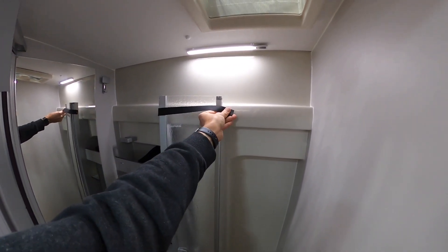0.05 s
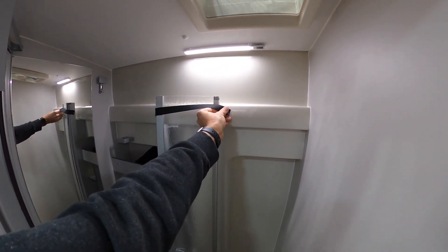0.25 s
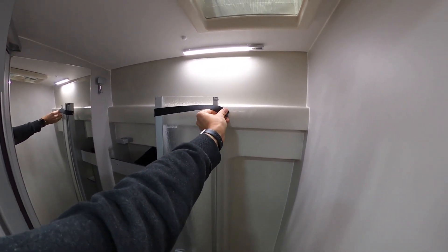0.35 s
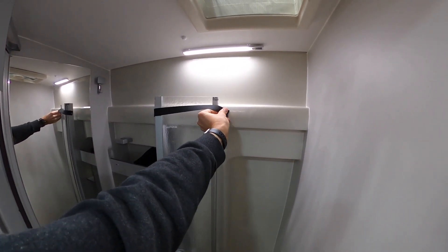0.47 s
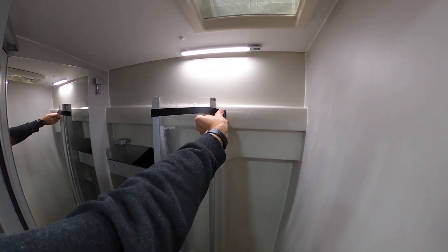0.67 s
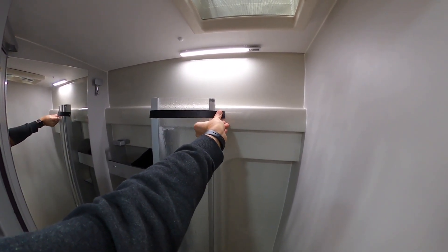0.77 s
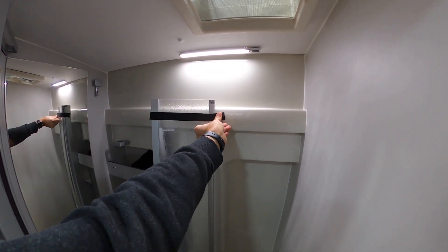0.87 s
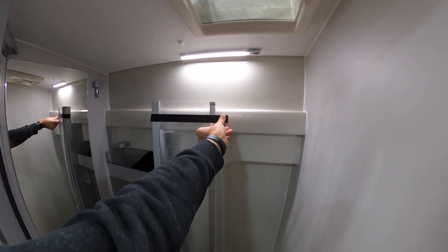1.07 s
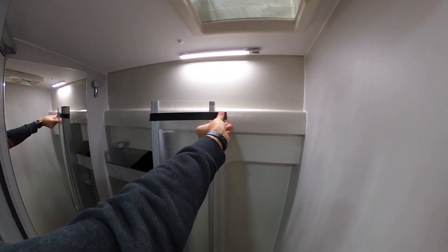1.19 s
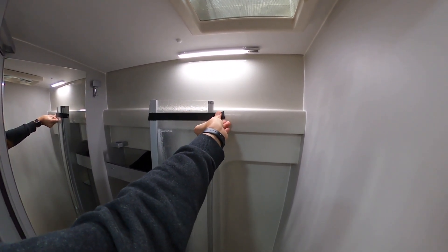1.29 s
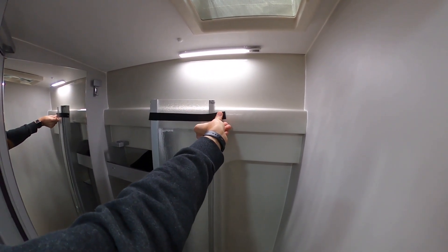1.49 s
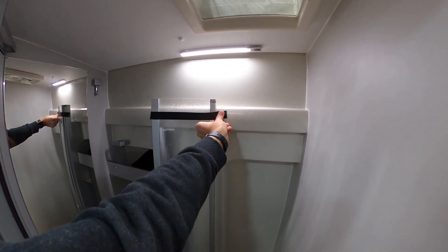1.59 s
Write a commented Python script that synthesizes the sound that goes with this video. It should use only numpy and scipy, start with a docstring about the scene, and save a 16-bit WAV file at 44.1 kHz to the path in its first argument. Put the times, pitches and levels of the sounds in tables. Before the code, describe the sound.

Hollow plastic panel knocks and short rattles as a folding shower door is pushed along.

```python
"""Knocks, hollow booms and short rattles: a folding plastic shower door is pushed along its rail.
The place is a very small washroom, its close walls smearing every contact over a low background rumble.
Shaped noise makes the background, the swaying panels, the rattles, the rubbing gliders
and the short noisy swells that lead into the knocks.
Decaying sines make the flexing panels, their boom and the brief ring of the rail."""
import sys
import numpy as np
from scipy import signal
from scipy.fft import irfft
from scipy.io import wavfile
from scipy.ndimage import uniform_filter1d

SR = 44100
rng = np.random.default_rng(int(sys.argv[2]) if len(sys.argv) > 2 else 0)


def master(y):
    """Save y as 16-bit WAV."""
    cut = np.clip(np.atleast_2d(y).T, -1, 1)
    pcm = np.round(cut * 32767)  # scale
    wavfile.write(sys.argv[1], SR, pcm.astype(np.int16))


N = 72765
TIME = np.arange(N) / SR
STRIKE_TIME = TIME[:SR // 2]  # half a second for each knock
CUTOFF_HZ = 15600


def from_db(db):
    """Decibels to gain."""
    return 10 ** (np.asarray(db) / 20)


def fade(t, t60):
    """Exponential decay that loses 60 dB in t60 seconds."""
    return np.exp(-np.log(1000) * t / t60)


def noise(spectrum, low_hz, high_hz, size):
    """Noise of rms 1, coloured by (hz, db) points between two soft edges, with random phases."""
    hz = np.maximum(np.fft.rfftfreq(size, 1 / SR), 1)
    point_hz, point_db = np.transpose(spectrum)
    edges = 1 / np.sqrt((1 + (low_hz / hz) ** 12) * (1 + (hz / high_hz) ** 12))
    gain = from_db(np.interp(np.log(hz), np.log(point_hz), point_db)) * edges
    x = irfft(gain * np.exp(2j * np.pi * rng.random(len(hz))), size)
    return x / x.std()


def evened(x, size):
    """Takes the slow swell out of a sound by dividing by its running rms."""
    return x / np.sqrt(uniform_filter1d(x * x, size, mode="wrap") + 1e-9)


def wander(length, size):
    """Smooth chance that changes about every `size` samples, spread 1."""
    x = rng.standard_normal(length)
    for _ in range(3):
        x = uniform_filter1d(x, size, mode="wrap")
    return x / x.std()


def follow(points):
    """Gain over time from (start_s, level_db) points, straight in dB between them."""
    start_s, level_db = np.transpose(points)
    return from_db(np.interp(TIME, start_s, level_db))


def add(out, start_s, sound):
    """Mixes a sound in at its start time."""
    i = max(int(start_s * SR), 0)
    out[i:i + len(sound)] += sound[:len(out) - i]


# edges of the registers thud, body, clack, click, tick, snap: edge_hz
REGISTER_EDGES = [30, 130, 550, 2000, 6000, 11500, 16000]


def register_of(hz):
    """Index of the register that holds a frequency."""
    return np.searchsorted(REGISTER_EDGES, hz) - 1


# colour of the room's background: pitch_hz, relative level_db (per Hz)
BACKGROUND_COLOUR = [(15, -8), (26, 6.5), (60, -18), (115, -17.5), (243, -32.5), (400, -33), (558, -34),
                     (811, -39), (1150, -33), (1600, -40.5), (3000, -65.5), (8000, -65), (15000, -83.5)]
# faint steady whine: pitch_hz, level_db
WHINE_TONES = [(9000, -93.5), (13500, -99)]
BACKGROUND_DB = -52.5


def background():
    """The room at rest: steady noise, a low rumble with some hiss, plus faint high sine tones."""
    whine = sum(from_db(db) * np.sin(2 * np.pi * hz * TIME) for hz, db in WHINE_TONES)
    return from_db(BACKGROUND_DB) * noise(BACKGROUND_COLOUR, 30, CUTOFF_HZ, N) + whine


# colour of the panels in the room: pitch_hz, relative level_db
PANEL_COLOUR = [(30, -5), (55, -5.5), (72, -2.5), (100, 2.5), (135, -8), (190, 0), (260, -6), (380, -6.5),
                (450, -17.5), (650, -19.5), (790, -14), (900, -16.5), (1130, -18), (1260, -4.5),
                (1480, -20.5), (1800, -16.5), (2150, -19.5), (2550, -18), (3300, -19.5), (4200, -23.5),
                (5400, -24.5), (6800, -31), (8400, -30), (10500, -38.5), (13200, -43.5), (15500, -49)]
# swaying of the panels under the hand: start_s, level_db
SWAY_LEVELS = [(0, -41.5), (.18, -56), (.5, -61.5), (.7, -55.5), (.85, -52), (1.05, -50.5), (1.3, -46.5),
               (1.45, -58.5), (1.65, -66)]
SWAY_TOP_HZ = 262


def swaying():
    """Moving panels rumble: evened low noise whose level follows their sway."""
    rumble = noise(PANEL_COLOUR, REGISTER_EDGES[0], SWAY_TOP_HZ, N)
    return follow(SWAY_LEVELS) * evened(rumble, size=2000)


# noise levels over time, before grain: rubbing gliders, and short noisy swells leading into the knocks:
# start_s, middle-band level_db, hiss level_db
NOISE_LEVELS = [(0, -60, -78), (.07, -58.5, -78.5), (.135, -64.5, -70), (0.198, -67.5, -74),
                (0.216, -49, -55), (.24, -79, -87), (.38, -77, -87), (.45, -72.5, -80), (0.558, -82, -93.5),
                (0.585, -55, -65), (.61, -53, -63), (.72, -70, -84.5), (.82, -70.5, -82.5),
                (0.891, -67.5, -85), (1.0, -71.5, -92), (1.04, -63.5, -78), (1.075, -69.5, -86.5),
                (1.119, -43.5, -53.5), (1.21, -57.5, -72), (1.303, -53, -66), (1.342, -65, -70.5),
                (1.36, -44, -57.5), (1.42, -58, -81), (1.52, -74, -89), (1.65, -77.5, -96)]
# colour of the middle band: pitch_hz, relative level_db
MIDDLE_COLOUR = [(620, 1), (800, -4.5), (1050, -2.5), (1260, 3.5), (1480, -3.5), (2100, -7.5), (2650, -5),
                 (2950, -8.5), (3300, -6.5), (4300, -11.5), (5400, -12), (6800, -26)]
# colour of the hiss: pitch_hz, relative level_db
HISS_COLOUR = [(5400, 2), (7000, -4), (8500, -7.5), (10500, -14), (13200, -13.5), (15500, -22)]
MIDDLE_LOW_HZ, MIDDLE_HIGH_HZ, GRAIN_DB = 636, 5340, 1
GROAN_DB, GROAN_HZ = 3.5, (323, 448)  # level above the middle band, band edges


def rubs_and_swells():
    """Grainy noise, hiss and a low groaning band: rubbing gliders and short swells into the knocks."""
    start_s, middle_db, hiss_db = np.transpose(NOISE_LEVELS)
    middle_gain = follow(np.column_stack([start_s, middle_db]))
    hiss_gain = follow(np.column_stack([start_s, hiss_db]))
    middle = middle_gain * noise(MIDDLE_COLOUR, MIDDLE_LOW_HZ, MIDDLE_HIGH_HZ, N)
    hiss = hiss_gain * noise(HISS_COLOUR, MIDDLE_HIGH_HZ, CUTOFF_HZ, N)
    groan = from_db(GROAN_DB) * middle_gain * evened(noise(PANEL_COLOUR, *GROAN_HZ, N), size=800)
    grain = from_db(GRAIN_DB * wander(N, size=70))
    return (middle + hiss) * grain + groan


# knocks of panels and gliders: start_s, flex pitch_hz of the panel, brightest resonance pitch_hz,
# then relative level_db of thud, body, clack, click, tick, snap
KNOCKS_TABLE = [(0.014, 165, 794, -46, -52, -52.5, -57, -69.5, -92),
                (0.032, 175, 760, -44, -38, -46.5, -72, -79, -94.5),
                (0.2167, 346, 5100, -30, -25.5, -40, -41, -54.5, -60),
                (0.222, 180.7, 990, -26.5, -20, -36, -43.5, -59, -76),
                (0.256, 61.5, 1240, -39, -35, -58, -65, -86, -96),
                (0.587, 347, 1230, -47.5, -43.5, -43.5, -45, -57.5, -76),
                (0.621, 75.3, 2850, -40, -52, -58, -65, -80, -90),
                (0.633, 342, 4700, -38.5, -52.5, -52, -45, -58.5, -61),
                (0.651, 85, 4170, -49, -59, -74, -53.5, -78, -78),
                (0.737, 112, 5000, -36.5, -50, -79, -71, -76, -85),
                (0.879, 125, 3570, -35.5, -44.5, -79, -66.5, -77.5, -91),
                (0.950, 199, 1460, -36, -43, -50, -66, -90, -99),
                (0.969, 205, 1050, -49.5, -35, -53.5, -73, -88, -99),
                (1.094, 329, 3300, -58, -42, -53, -54.5, -78, -88),
                (1.123, 350, 2450, -49, -40, -36.5, -37, -46, -58),
                (1.130, 101, 1286, -42.5, -37.5, -33.5, -37, -48, -61),
                (1.165, 398, 5740, -43, -35.5, -41, -49.5, -75, -78),
                (1.176, 203, 1510, -38, -32.5, -51, -67, -77, -84),
                (1.191, 217, 900, -58, -37.5, -60, -73, -87, -90),
                (1.25, 387, 3180, -38, -46.5, -63, -53, -76, -80),
                (1.285, 93, 1260, -35.5, -45, -51.5, -65, -76, -70),
                (1.295, 51, 3270, -40.5, -54, -68, -64, -80, -73),
                (1.361, 401, 1670, -44, -33, -35.5, -40.5, -50.5, -50.5),
                (1.373, 287, 1050, -62, -32.5, -42.5, -65, -73, -71),
                (1.439, 220, 3820, -40, -48, -52.5, -52.5, -75, -83)]
FLEX_DB, FLEX_CYCLES = 6.5, 13.7  # level above the knock's register, cycles to fade 60 dB


def flexing():
    """The struck panel springs back and forth for a few cycles, a quickly fading sine."""
    out, t = np.zeros(N), STRIKE_TIME
    for start_s, flex_hz, _, *levels in KNOCKS_TABLE:
        onset = 1 - np.exp(-(2 * t * flex_hz) ** 2)
        swing = np.sin(2 * np.pi * flex_hz * t) * onset * fade(t, FLEX_CYCLES / flex_hz)
        add(out, start_s, from_db(FLEX_DB + levels[register_of(flex_hz)]) * swing)
    return out


# booming modes of the hollow panels: pitch_hz, relative level_db, t60_s
BOOM_MODES = [(55.3, -7.5, 0.39), (106, -12, .3), (169, -18.5, 0.44), (194.5, -16.5, 0.45),
              (227.7, -18.5, 0.2), (272, -11.5, 0.14), (341.9, -14, 0.24), (385.7, -13.5, 0.16),
              (489, -19.5, 0.16)]
# ringing modes of the rail and frame: pitch_hz, relative level_db, t60_s
FRAME_MODES = [(891.3, -14.5, 0.22), (1260, -10, 0.2), (1280, -29, .16), (1755, -14, .2), (1934, -15, .15),
               (2480, -12.5, 0.19), (2550, -6.5, 0.17), (3310, -13, 0.13), (5420, -15.5, .17),
               (6115, -7.5, .15), (8220, -11, 0.12), (13200, -9, .13)]
PANEL_DB, RAIL_DB = -3.5, -2.5
MODE_SPREAD_DB, FAVOUR_DB = 2.5, 8.5  # chance per strike, lift for modes near the knock's own pitches
BRIGHT_OCTAVES = 0.12  # width of a knock's favoured pitches


def ringing(modes):
    """Knocks strike each mode as hard as its register, favouring modes near their own pitches."""
    out, t = np.zeros(N), STRIKE_TIME
    for hz, db, t60 in modes:
        register = register_of(hz)
        attack_s = REGISTER_DECAY[register][1]
        onset = 1 - np.exp(-(t / attack_s) ** 2)
        tone = np.sin(2 * np.pi * hz * t) * fade(t, t60) * onset
        for start_s, flex_hz, bright_hz, *levels in KNOCKS_TABLE:
            octaves_away = np.log2(hz / np.array([flex_hz, bright_hz]))
            near = np.exp(-(octaves_away / BRIGHT_OCTAVES) ** 2).max()
            chance_db = MODE_SPREAD_DB * rng.standard_normal()
            strike_db = db + levels[register] + FAVOUR_DB * near + chance_db
            add(out, start_s, from_db(strike_db) * tone)
    return out


BRIGHT_DB = 9


def brightened(centre_hz):
    """The panels' colour with the resonance nearest the contact lifted."""
    hz = np.geomspace(REGISTER_EDGES[0], REGISTER_EDGES[-1], 400)
    point_hz, point_db = np.transpose(PANEL_COLOUR)
    lift = BRIGHT_DB * np.exp(-(np.log2(hz / centre_hz) / BRIGHT_OCTAVES) ** 2)
    return np.column_stack([hz, np.interp(np.log(hz), np.log(point_hz), point_db) + lift])


# how each register rattles: relative level_db, attack_s, t60_s, relative level_db of the lingering tail
REGISTER_DECAY = [(-2.5, 0.0027, .15, -14), (-2.5, 0.0017, 0.19, -15.5), (0.5, 0.0005, 0.15, -18),
                  (0, 0.0017, 0.14, -20.5), (0.5, 0.0018, 0.14, -26), (-1, .0008, 0.12, -30)]
TAIL_T60_S = 0.35
REFLECTION_SPREAD_DB, REFLECTION_FADE_S = 2, 0.053  # starting spread, time for it to fall to 1/e


def rattle():
    """Close walls smear each knock: bunched early reflections merge into a tail in every register."""
    out, t = np.zeros(N), STRIKE_TIME
    for k, (level_db, attack_s, t60, tail_db) in enumerate(REGISTER_DECAY):
        low, high = REGISTER_EDGES[k:k + 2]
        onset = 1 - np.exp(-(t / attack_s) ** 2)
        tail = from_db(tail_db) * fade(t, TAIL_T60_S)
        envelope = onset * np.hypot(fade(t, t60), tail)
        for start_s, _, bright_hz, *levels in KNOCKS_TABLE:
            colour = brightened(bright_hz)
            dense = evened(noise(colour, low, high, len(t)), size=max(2 * SR // low, 400))
            spread_db = REFLECTION_SPREAD_DB * np.exp(-t / REFLECTION_FADE_S)
            bunching_db = spread_db * wander(len(t), size=max(SR // low, 30))
            bunching = evened(from_db(bunching_db), size=600)
            add(out, start_s, from_db(levels[k] + level_db) * envelope * dense * bunching)
    return out


def scene():
    """The door over the room's background, as one channel."""
    boom = from_db(PANEL_DB) * ringing(BOOM_MODES)
    rail = from_db(RAIL_DB) * ringing(FRAME_MODES)
    door = swaying() + rubs_and_swells() + flexing() + boom + rail + rattle()
    return (background() + door)[None]


def record(dry):
    """The microphone signal loses its top to a steep elliptic low-pass."""
    low_pass = signal.ellip(10, .2, 80, CUTOFF_HZ, fs=SR, output="sos")
    return signal.sosfilt(low_pass, dry)


dry = scene()
out = record(dry)
master(out)
```